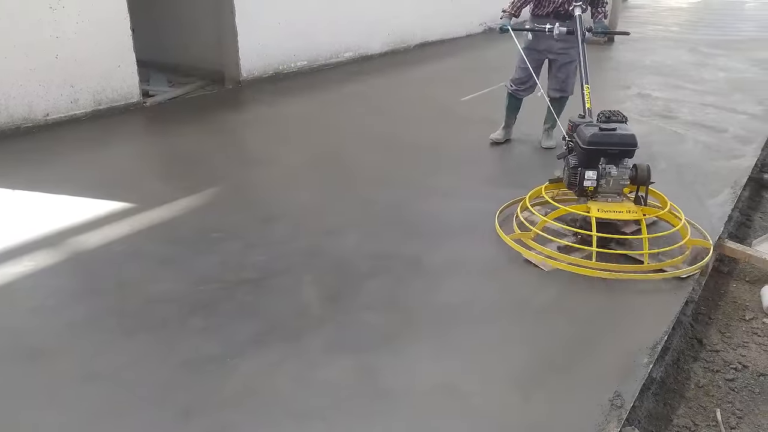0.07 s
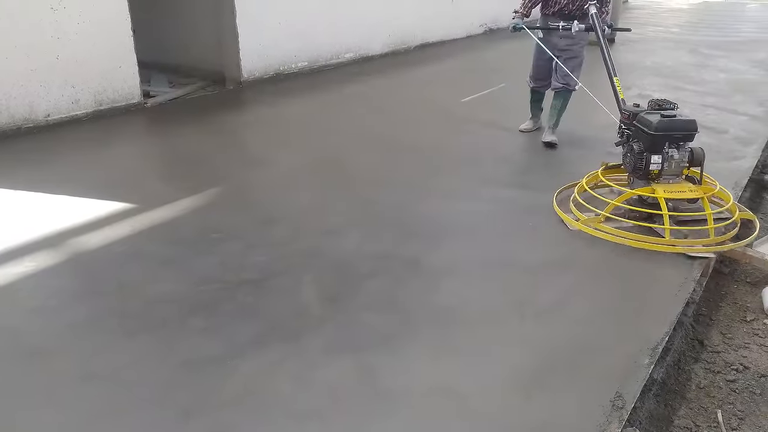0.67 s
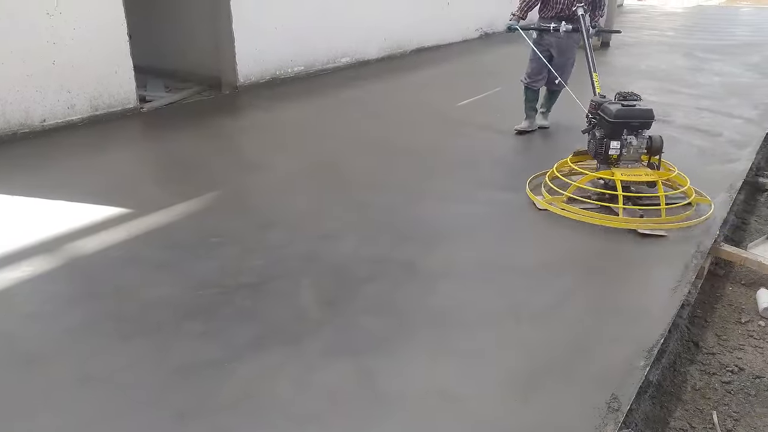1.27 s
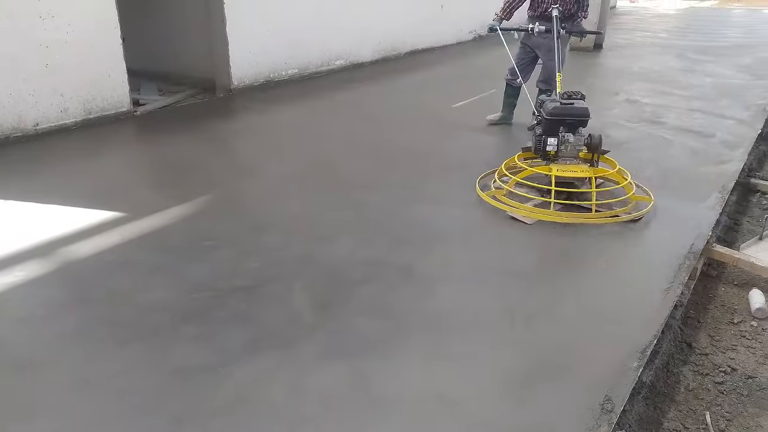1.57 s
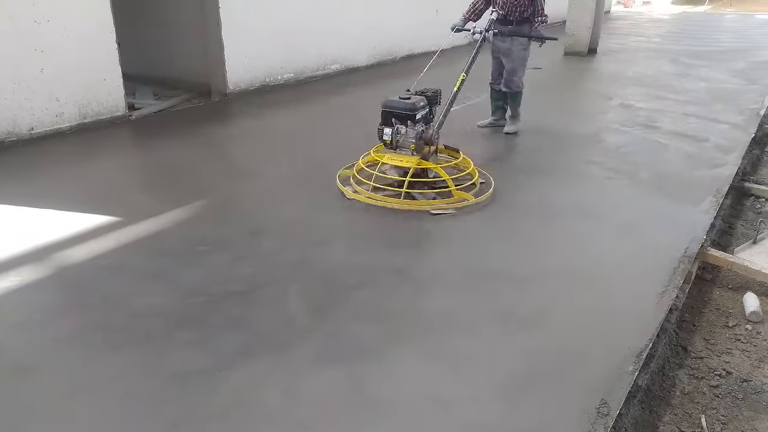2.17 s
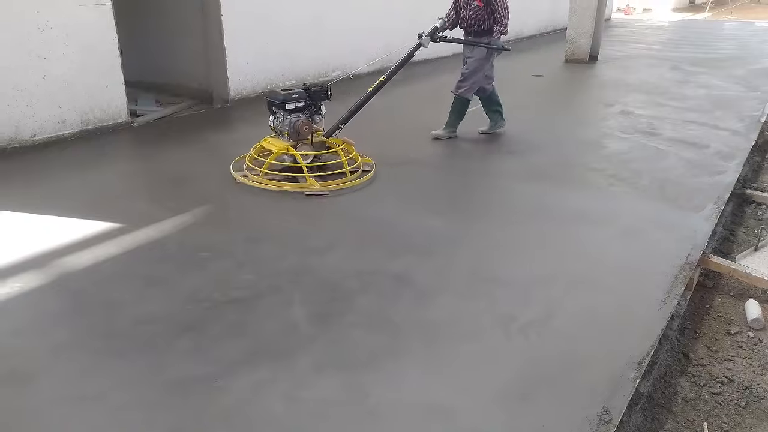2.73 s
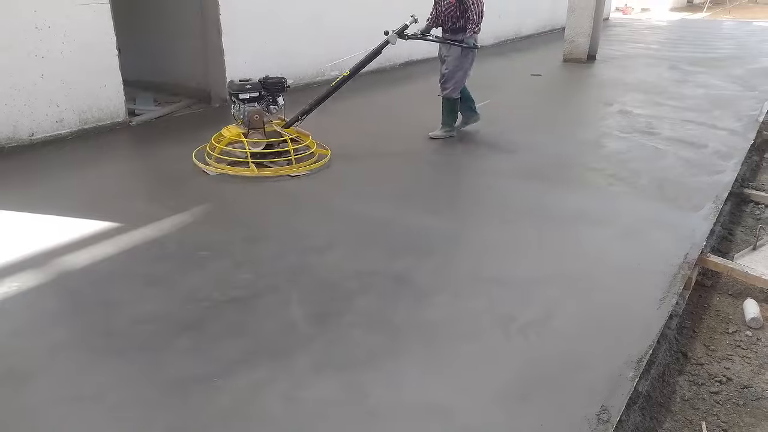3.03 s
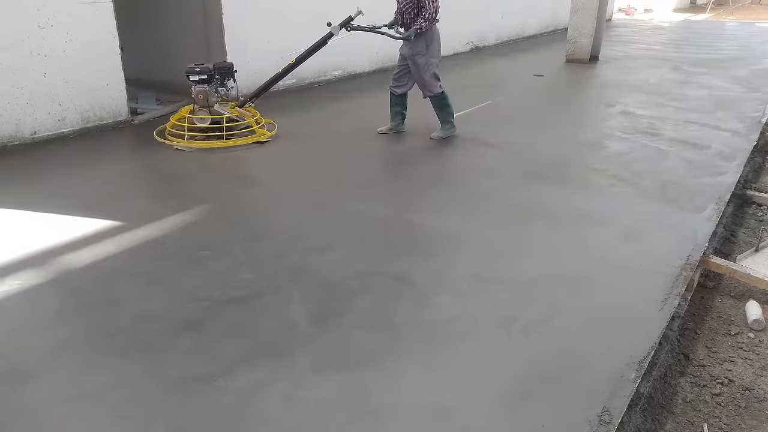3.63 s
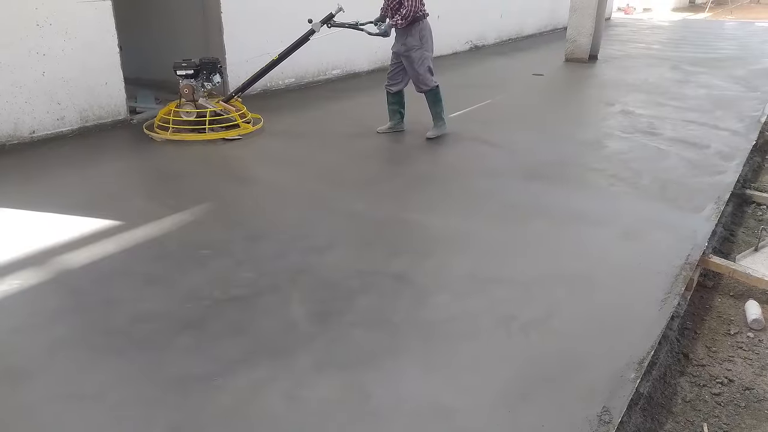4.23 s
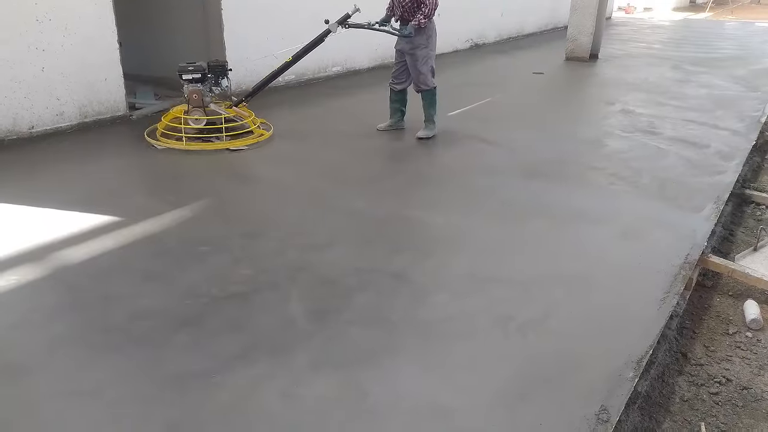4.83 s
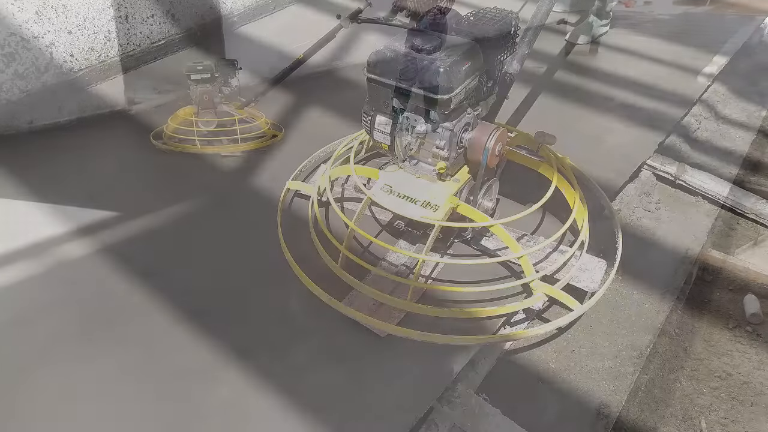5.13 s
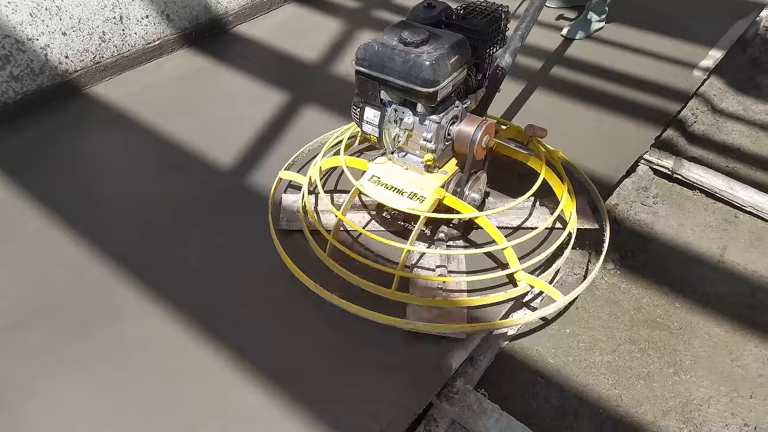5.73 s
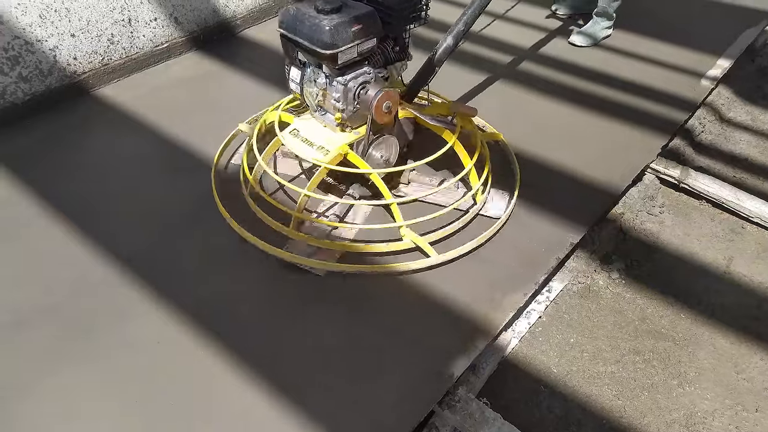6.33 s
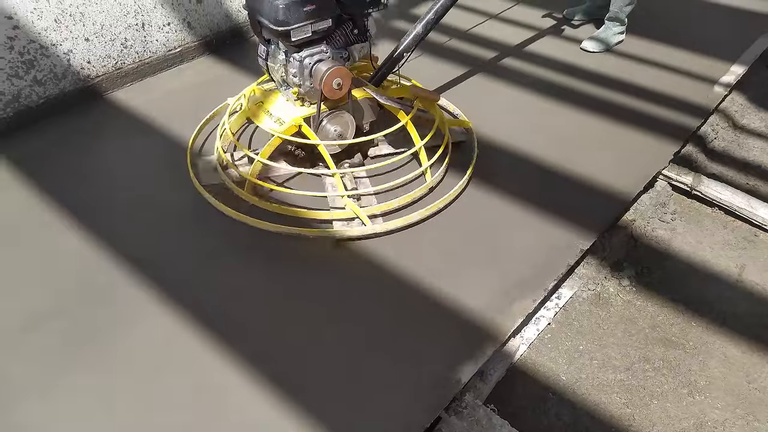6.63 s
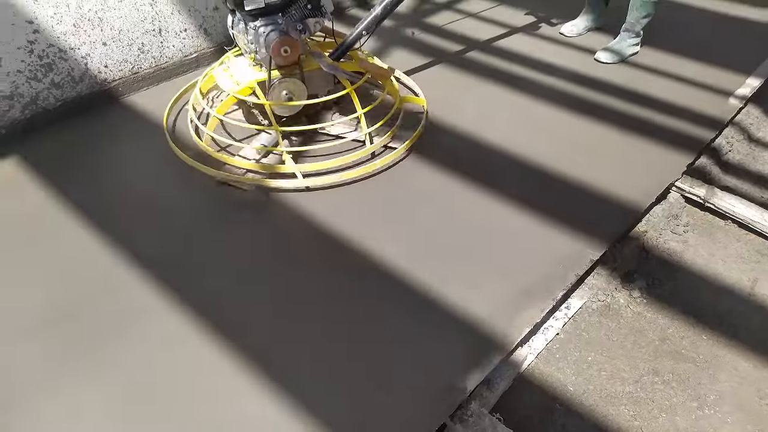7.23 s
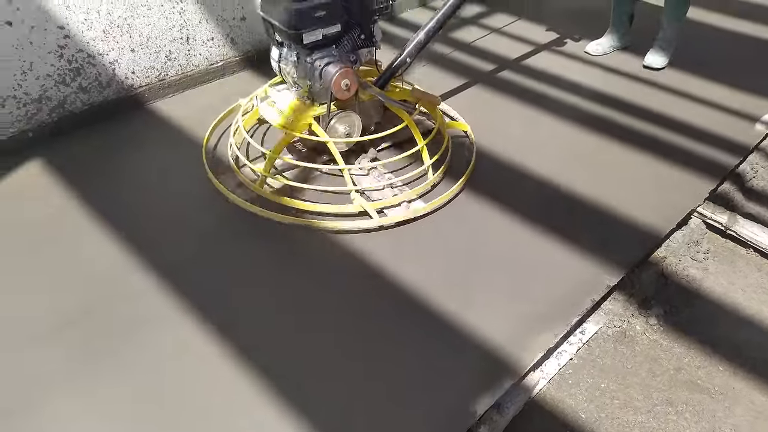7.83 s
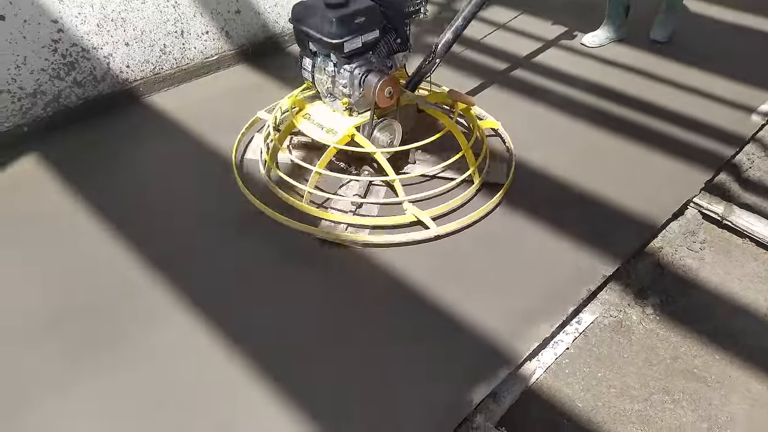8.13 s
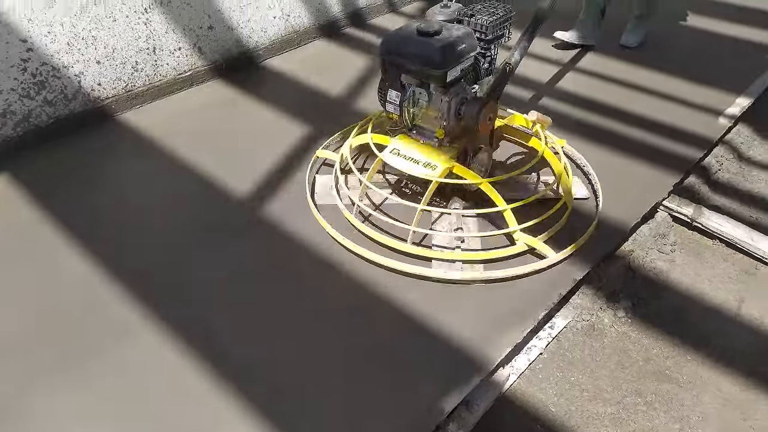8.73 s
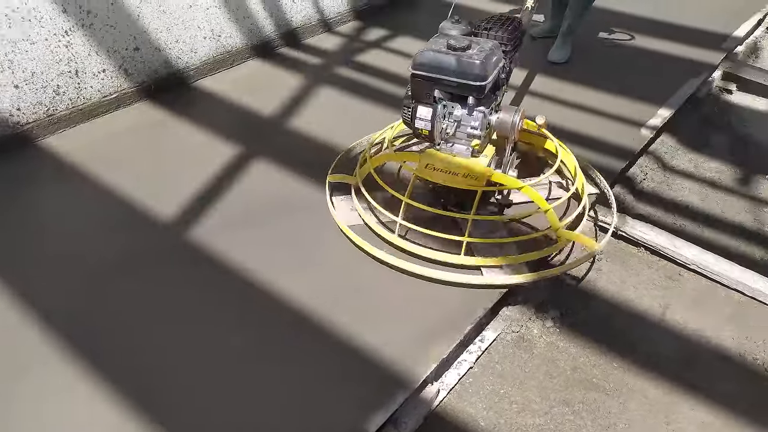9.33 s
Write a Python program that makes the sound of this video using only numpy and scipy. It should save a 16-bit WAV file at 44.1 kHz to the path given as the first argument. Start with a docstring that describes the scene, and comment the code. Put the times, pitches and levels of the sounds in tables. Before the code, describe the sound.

From the start, a walk-behind power trowel is heard at a distance, working a concrete slab outdoors beside a wall. Its single-cylinder petrol engine drones, ticks and rattles, dipping slightly under load. The steel blades hiss and grind over the surface with irregular light knocks, swelling with each pass for the first 1.5 seconds. Light wind rumbles on the microphones, with a small gust near 0.4 seconds. At about 5.3 seconds everything cuts to a short silence. From 5.5 seconds the machine is close by, with a chugging exhaust, a rattling guard and coarser scraping, and another gust passes near 5.8 seconds. The blades dig in with short groans around 6.4 and 6.7 seconds. Near 7.6 seconds the engine sags deeply, then recovers. The blades groan again around 7.9 and 8.4 seconds, and the machine keeps running until the end at 9.5 seconds.

```python
"""A walk-behind power trowel finishes a concrete slab beside a wall, heard at a pair of microphones.
From afar at first, its single-cylinder four-stroke engine drones, ticks and rattles, sagging under load,
while the steel blades hiss round over the concrete and knock in light wind. At 5.3 s, a short silence.
From 5.5 s the machine is close by: the exhaust chugs, the blades dig in and groan, and near 7.6 s
the engine sags deeply, then recovers."""
import sys
import numpy as np
from scipy import signal
from scipy.fft import rfft, irfft
from scipy.io import wavfile
from scipy.ndimage import uniform_filter1d

SR = 44100
rng = np.random.default_rng(int(sys.argv[2]) if len(sys.argv) > 2 else 0)


def bounce(signal):
    """Save signal as a 16-bit WAV file at the path given by the first command-line argument."""
    frames = np.transpose(np.atleast_2d(signal))
    limited = np.clip(frames, -1, 1)
    pcm = np.round(limited * 32767).astype(np.int16)
    wavfile.write(sys.argv[1], SR, pcm)


N = 418950
TIME = np.arange(N) / SR
HZ = np.fft.rfftfreq(N, 1 / SR)


def amp(db):
    """Decibels to gain."""
    return 10 ** (np.asarray(db) / 20)


def unit(x):
    """Scales to rms 1."""
    return x / np.sqrt(np.mean(x ** 2) + 1e-20)


def curve(rows):
    """Rows of (t/s, value), joined by straight lines."""
    return np.interp(TIME, *np.transpose(rows))


def spectrum(points):
    """Rows of (f/Hz, value), joined by straight lines over log frequency."""
    hz, value = np.transpose(points)
    return np.interp(np.log(HZ + 1), np.log(hz), value)


def colour(x, points):
    """Filters by rows of (f/Hz, gain/dB), then scales to rms 1."""
    return unit(irfft(rfft(x) * amp(spectrum(points)), N))


def wander(rate_hz):
    """Random drift of rms 1, up to about rate_hz."""
    return unit(irfft(rfft(rng.standard_normal(N)) * np.exp(-(HZ / rate_hz) ** 2), N))


def swell(s, width_s):
    """A bell-shaped rise and fall around time s."""
    return np.exp(-np.minimum(((TIME - s) / width_s) ** 2, 20))


def swells(rows):
    """The sum of swells, each (t/s, height, half-length/s)."""
    return sum(height * swell(s, width_s) for s, height, width_s in rows)


def bursts(rows):
    """The gain of passing sounds, each (t/s, level/dB, half-length/s)."""
    return sum(amp(db) * swell(s, width_s) for s, db, width_s in rows)


def delayed(x, delay_s):
    """Both channels, later by a steady or drifting delay."""
    return np.array([np.interp(TIME - delay_s, TIME, channel, left=0) for channel in x])


# time spent far from the machine, then close by: start t/s, end t/s
FAR_AND_NEAR = [(0, 5.263), (5.481, 9.5)]
NEAR_FROM_S = FAR_AND_NEAR[1][0]
def by_place(far, near):
    """The far value first, the near one once the microphones stand close."""
    return np.where(TIME < NEAR_FROM_S, far, near)


# likeness of the left and right microphones: f/Hz, coherence/0-1
MIC_COHERENCE = [(60, 1), (290, 0.97), (640, 0.7), (950, 0.95), (1400, 0.01), (3100, 0.17), (7000, 0)]
def pair_noise():
    """Noise at two microphones: alike in the bass, unrelated in the treble."""
    mid, side = rfft(rng.standard_normal((2, N)))
    coherence = np.clip(spectrum(MIC_COHERENCE), 0, 1)
    mid *= np.sqrt((1 + coherence) / 2)
    side *= np.sqrt((1 - coherence) / 2)
    return irfft(np.array([mid + side, mid - side]), N)


# the engine sags, or overshoots if negative: t/s, drop in firing rate/Hz, half-length/s
LOAD_SAGS = [(.11, .56, .4), (.95, .84, .15), (1.5, 1.57, .49), (2.61, 1.15, .28), (3.42, -.5, .09),
             (5, 1.2, .14), (5.76, 2.97, .24), (6.27, -.83, .16), (6.56, .95, .37), (7.57, 6.03, .31),
             (8.29, -1.34, .13), (8.54, 2.67, .26), (9.25, 2.12, .18)]
def engine_cycles(governed_hz=32.45):
    """Running count of firings: the governed rate drops as the blades bite, then recovers."""
    firing_hz = (governed_hz - swells(LOAD_SAGS)) * (1 + .002 * wander(10))
    return np.cumsum(firing_hz) / SR


# engine tones from afar and close by: multiple of the firing rate, relative level/dB
FAR_HARMONICS = [(1, -29), (2, 1), (3, -4.5), (4, -15.5), (5, -5.5), (6, -5), (7, -12), (8, -17), (9, -2.5),
                 (10, -0.5), (11, -3.5), (12, -8), (13, -12.5), (14, -11), (15, -16)]
NEAR_HARMONICS = [(1, 2.5), (2, 4), (3, -3.5), (4, -21), (5, -5), (6, -2), (7, -14.5), (8, -6), (9, 4.5),
                  (10, 3), (11, -2.5), (12, -8.5), (13, -7.5), (14, -14.5), (15, -7)]
# one tone swells or fades as the machine swings round: t/s, multiple, change/dB, half-length/s
HARMONIC_SWELLS = [(.35, 10, -18.5, 0.33), (1.101, 9, -13.5, 0.17), (1.2, 7, -10, 1), (1.25, 10, 2.5, 0.42),
                   (1.35, 12, 6.5, 0.35), (1.85, 9, 13, 0.63), (1.97, 6, -6.5, 0.16), (2.3, 11, -8.5, .35),
                   (2.151, 12, 10, 0.18), (2.294, 9, -17.5, .05), (2.596, 12, 9, 0.21), (2.602, 9, 3, 0.2),
                   (2.677, 5, -9, 0.14), (3.12, 12, 8.5, 0.13), (3.168, 6, -15, 0.087), (3.25, 9, 8, 0.21),
                   (3.7, 7, 1, 1), (4.151, 8, 11.5, .6), (4.1, 10, -0.5, 0.68), (5.85, 9, 0.5, 0.31),
                   (6.25, 11, 3, 0.29), (6.6, 7, 9, .45), (6.6, 9, -5, .45), (7.268, 8, 13, 0.068),
                   (7.5, 10, -11.5, .25), (7.6, 15, -7, .3), (8.15, 10, -6.5, 0.083), (8.15, 8, 8.5, .12),
                   (7.62, 9, 8, 0.18), (7.78, 11, 10.5, 0.064), (8.56, 12, 11, 0.092),
                   (8.97, 5, -13.5, .05), (9.05, 11, -0.5, .25), (8.85, 10, -4, 0.26)]
def firing_tones(cycles, drift_db=1.1, uneven_db=1.1, pulse_at=.1):
    """Harmonics of the uneven firing pulses; each fades as the wall's reflection slips against it."""
    tones = np.zeros((2, N))
    # echoes scatter the tones' timing from afar; close by they line up into a chug
    scatter_turns = by_place(.36, .16)
    wall_share, slip_per_order = by_place(.24, .42), by_place(.2, .36)
    for order, ((_, far_db), (_, near_db)) in enumerate(zip(FAR_HARMONICS, NEAR_HARMONICS), 1):
        turns = order * (cycles - pulse_at) + scatter_turns * rng.standard_normal()
        phase = 2 * np.pi * turns + .15 * wander(3)
        beaming_db = swells((s, db, width) for s, k, db, width in HARMONIC_SWELLS if k == order)
        tone_db = by_place(far_db, near_db) + beaming_db + drift_db * wander(2.8)
        mic_offset = .15 * rng.standard_normal()
        phases = np.array([phase + mic_offset, phase - mic_offset])
        slip = order * slip_per_order * wander(1.3)
        tones += amp(tone_db) * (np.cos(phases) + wall_share * np.cos(phases + slip))
    return unit(tones * amp(uneven_db * wander(22)))


# gas noise from the muffler: f/Hz, gain/dB
PUFF_COLOUR = [(20, -22), (60, -4.5), (110, -36.5), (165, 5), (215, 11.5), (320, 10), (400, 6.5),
               (500, -34)]
# roughness of the firing: t/s, the puffs' share of the power/0-1
ROUGHNESS = [(0, .08), (1, .045), (2.5, .05), (3.1, .08), (4.5, .09), (5.5, .12), (6.2, .14), (7, .19),
             (7.5, .25), (8.35, .36), (8.65, .1), (9.5, .09)]
# upper edges of the throb, boom, drone, bark and overtones: f/Hz
REGISTER_EDGES = [140, 177, 255, 345, 480]
# the four registers above the throb, towards the microphones: t/s, level/dB
BOOM_LEVEL = [(0, -34), (.8, -34), (1.6, -29), (2, -25), (2.45, -24), (2.7, -35), (3, -32), (3.25, -23),
              (3.7, -23), (4.3, -32.5), (5.2, -23), (5.95, -29), (6.35, -25), (7, -35.5), (7.8, -27.5),
              (8.05, -38.5), (8.27, -26.5), (9.5, -20.5)]
DRONE_LEVEL = [(0, -25), (.6, -27), (1.05, -22), (1.7, -23), (2.05, -27.5), (2.4, -26), (3.15, -23.5),
               (3.65, -22), (4.25, -25), (4.8, -22), (5.5, -29.5), (6.5, -25), (7.65, -26), (8.05, -30),
               (8.5, -22.5), (9.15, -30.5), (9.5, -27.5)]
BARK_LEVEL = [(0, -29), (.7, -30), (1.95, -22.5), (2.3, -28.5), (2.65, -20.5), (2.92, -26.5), (3.25, -19.5),
              (4.95, -27), (5.25, -23), (6.05, -24), (6.35, -27), (7.5, -26.5), (7.8, -22), (8.3, -31.5),
              (8.8, -25), (9.5, -23)]
OVERTONE_LEVEL = [(0, -34), (.75, -32.5), (1.2, -23), (1.85, -24.5), (2.15, -23.5), (2.36, -26.5),
                  (2.6, -24), (2.9, -27), (3.4, -26.5), (4.5, -30), (5.25, -29.5), (5.9, -31), (6.38, -29),
                  (6.6, -30.5), (7.4, -35.5), (7.8, -26.5), (8.1, -38), (8.55, -24), (9.5, -33)]
def exhaust(cycles, throb_db=-36.5, puff_floor=.14, puff_decay_cycles=.14):
    """Each firing pushes a pulse and a puff of gas through the muffler."""
    tones = firing_tones(cycles)
    puff_shape = puff_floor + np.exp(-(cycles % 1) / puff_decay_cycles)
    puffs = colour(pair_noise() * puff_shape, PUFF_COLOUR)
    rough = np.clip(curve(ROUGHNESS), 0, 1)
    gas = rfft(np.sqrt(1 - rough) * tones + np.sqrt(rough) * puffs)
    # the crankcase throb is steady; the muffler's registers beam differently
    levels_db = [throb_db, *map(curve, [BOOM_LEVEL, DRONE_LEVEL, BARK_LEVEL, OVERTONE_LEVEL])]
    out, below = np.zeros((2, N)), 0
    for edge_hz, level_db in zip(REGISTER_EDGES, levels_db):
        low_pass = 1 / (1 + (HZ / edge_hz) ** 30)
        register = irfft(gas * (low_pass - below), N)
        power = uniform_filter1d(np.mean(register ** 2, axis=0), size=SR // 3)
        out += amp(level_db) * register / np.sqrt(power + 1e-12)
        below = low_pass
    return out


# the valve cover swings towards the microphones: t/s, rise/dB, half-length/s
VALVE_FACING = [(3.1, 3, 0.9), (7.75, 6, 0.21)]
def valves(cycles, turned_away_db=-28.5, decay_cycles=.085, second_at=.47, second_db=-7):
    """The valves tick brightly twice in each engine cycle, the second tick softer."""
    first = np.exp(-(cycles % 1) / decay_cycles)
    second = amp(second_db) * np.exp(-((cycles - second_at) % 1) / decay_cycles)
    ticks = pair_noise() * (first + second) * amp(wander(25))
    tick_colour = [(700, -16), (1500, -5), (2500, -3), (3400, -3), (5500, -2), (8800, 4),
                   (10500, -5), (12000, -13.5), (15000, -30)]
    return amp(turned_away_db + swells(VALVE_FACING)) * colour(ticks, tick_colour)


# modes of the belt guard: f/Hz, relative level/dB, t60/s
GUARD_MODES = [(2320, -1.5, 0.0076), (2494, -2.5, .018), (2550, -0.5, .012), (2920, -2, 0.015)]
# its rattle: t/s, level/dB
RATTLE_LEVEL = [(0, -37), (1.3, -38), (2.1, -31), (2.6, -36), (5.3, -55), (5.5, -30.5), (6.4, -28.5),
                (7, -33), (8.4, -41), (9.5, -43.5)]
# it shakes harder for a moment: t/s, rise/dB, half-length/s
GUARD_SHAKES = [(.25, 9, 0.043), (3.12, 10, .12), (5.52, 4, .03), (5.68, 11, 0.038), (5.85, 4, .03),
                (6.05, 11, 0.043)]
def guard_rattle(cycles, press_db, uneven_db=3, loose_turns=.11, press_share=.77):
    """The guard is struck once per crankshaft turn, twice to a firing, harder when a blade presses."""
    turns = np.maximum.accumulate(2 * cycles + loose_turns * wander(60))
    strikes = np.diff(np.floor(turns), prepend=0).clip(0, 1)
    strikes *= amp(uneven_db * wander(60) + press_share * press_db)
    t = np.arange(SR // 30) / SR
    ringing = np.zeros((2, N))
    for hz, db, t60 in GUARD_MODES:
        # each strike stirs each mode by a different amount
        blows = strikes * (rng.standard_normal((2, N)) + 1j * rng.standard_normal((2, N)))
        mode = amp(db - 60 * t / t60) * np.exp(2j * np.pi * hz * t)
        ringing += signal.oaconvolve(blows, mode[None])[:, :N].real
    band = [(1200, -30), (2100, .5), (2950, -.5), (3300, -19), (6000, -34)]
    return amp(curve(RATTLE_LEVEL) + swells(GUARD_SHAKES)) * colour(ringing, band)


# rotor speed, unsteady at first while the machine is swung about: t/s, blade passes per firing
ROTOR_SPEED = [(0, .277), (.3, .241), (.6, .248), (.9, .264), (1.15, .312), (1.3, .298), (1.5, .275),
               (1.7, .26)]
# swell of each passing blade, deepest along the slab's edge: t/s, swing/dB
BLADE_SWING = [(0, 2.6), (.95, 3.1), (1.45, 2.9), (1.65, 1), (2.6, .3), (9.5, 0.3)]
# a blade meets a high spot on the slab: t/s, rise/dB
SLAB_HIGH_SPOTS = [(2.056, 0), (3.044, 2.5), (3.627, 3), (4.385, 3), (4.461, 4), (4.753, 4), (4.82, 1),
                   (5.085, 2.5), (5.51, 4.5), (5.618, 3), (6.103, 1), (6.243, 2), (6.62, 0), (6.871, 3),
                   (6.983, 4), (7.15, 5), (8.3, 2.5), (8.811, 3.5), (9.105, 1.5), (9.218, 1.5)]
def blade_pressure_db(cycles, spot_s=.03, unsteady_db=.45):
    """How hard the steel presses: it rises with each passing blade and on high spots."""
    passes = np.cumsum(np.diff(cycles, prepend=0) * curve(ROTOR_SPEED))
    spots = sum(rise * swell(s, spot_s) for s, rise in SLAB_HIGH_SPOTS)
    return curve(BLADE_SWING) * np.cos(2 * np.pi * passes) + spots + unsteady_db * wander(16)


# narrow resonances of the steel blades and guard: f/Hz, half-width/Hz, rise/dB
STEEL_RESONANCES = [(1541, 18, 5.5), (1675, 38, 5.5), (1860, 15, 4), (2010, 45, 4), (7450, 70, 0.5),
                    (9250, 62, 3.5)]
# grit under the blades, from afar and close by: f/Hz, gain/dB
FAR_GRIND_COLOUR = [(330, -7.5), (470, -3.5), (640, -1.5), (1000, 5.5), (1400, -3), (1650, -0.5),
                    (2000, -3.5), (2500, 1), (2950, -2), (3300, -7), (4200, -26.5)]
NEAR_GRIND_COLOUR = [(330, -4), (470, -2.5), (620, 7), (1000, 6), (1400, 8), (1650, 1), (2000, 1.5),
                     (2450, 10), (3300, -3), (4200, -26.5)]
FAR_HISS_COLOUR = [(2500, -42), (3600, 1.5), (4400, -1.5), (5600, 1.5), (7400, 3.5), (8800, 8), (9600, 2.5),
                   (10500, 0), (12000, -11.5), (13300, -9), (15000, -43)]
NEAR_HISS_COLOUR = [(2500, -8.5), (3600, -1), (4600, -3), (5700, -3), (7400, -0.5), (8800, 4), (9600, 4),
                    (10500, -1), (12000, -14.5), (13300, -14.5), (15000, -56)]
# grinding and hiss together: t/s, base level/dB
SCRAPE_LEVEL = [(0, -16), (3.25, -17), (4.6, -17.5), (5.25, -20.5), (5.5, -15.5), (6.2, -16), (7.1, -18),
                (9.5, -15.5)]
# the coarser hiss of dry sand: t/s, base level/dB
SAND_LEVEL = [(0, -36), (.7, -40), (1.3, -37), (1.9, -32), (2.6, -35.5), (4.6, -45.5), (5.5, -40.5),
              (6.6, -34.5), (7.3, -29.5), (7.9, -37), (9.5, -36.5)]
def scrape(press_db, far_grind_db=-3, near_grind_db=-2, hiss_db=-3.5, grind_share=.4):
    """Steel drags over sand grains: a coarse grinding and a fine hiss that swell with each blade."""
    grit = amp(.5 * wander(260))
    steel = amp(sum(db / (1 + ((HZ - hz) / width) ** 2) for hz, width, db in STEEL_RESONANCES))
    coarse = irfft(rfft(pair_noise() * grit * amp(.95 * wander(42))) * steel, N)
    fine = irfft(rfft(pair_noise() * grit) * steel, N)
    grind = by_place(amp(far_grind_db) * colour(coarse, FAR_GRIND_COLOUR),
                     amp(near_grind_db) * colour(coarse, NEAR_GRIND_COLOUR))
    hiss = by_place(colour(fine, FAR_HISS_COLOUR), colour(fine, NEAR_HISS_COLOUR))
    sand = colour(fine, [(3200, -17), (4000, -1), (4800, 3), (5400, -13), (6500, -2.5),
                         (7500, -3), (9000, -20.5)])
    scraping = grind * amp(grind_share * press_db) + hiss * amp(hiss_db + press_db)
    return amp(curve(SAND_LEVEL) + press_db) * sand + amp(curve(SCRAPE_LEVEL)) * scraping


def slab_echo(x, echo_db=-11, delay_s=.0021, drift_s=.000159):
    """The wet slab mirrors the scraping; the path to the microphones shifts as the machine moves."""
    return x + amp(echo_db) * delayed(x, delay_s + drift_s * wander(.58))


def hiss_shimmer(x, depth_db=1.3):
    """Random narrow bands of the scraping hiss briefly swell and fade."""
    frames = signal.stft(x, nperseg=512)[2]
    smoothing = np.outer(np.hanning(7), np.hanning(16))
    shimmer = signal.oaconvolve(rng.standard_normal(frames.shape[1:]), smoothing, "same")
    return signal.istft(frames * amp(depth_db * unit(shimmer)), nperseg=512)[1][:, :N]


# the blades' ringing, which the light knocks also follow: t/s, base level/dB
RING_LEVEL = [(0, -19), (1.2, -28.5), (1.95, -25.5), (2.7, -35.5), (3.45, -33), (3.8, -22), (5.2, -25.5),
              (5.5, -34.5), (6.9, -18.5), (7.5, -20.5), (9.5, -21.5)]
def blade_ring(gain_db=-3, flutter_db=2):
    """Constant small slips keep the blades ringing in one broad resonance."""
    slips = pair_noise() * amp(flutter_db * wander(32))
    far = colour(slips, [(500, -52), (760, -11.5), (900, -1), (1030, -3.5), (1250, -1.5), (1600, -51)])
    near = colour(slips, [(450, -27), (700, -2.5), (860, -2), (980, 1), (1250, -14.5), (1600, -36)])
    return by_place(far, near) * amp(curve(RING_LEVEL) + gain_db)


def hum(hum_hz=133, hum_db=-38):
    """A faint steady hum, heard only at the far position."""
    phase = 2 * np.pi * hum_hz * TIME + .21 * wander(2.7)
    return by_place(amp(hum_db), 0) * np.sqrt(2) * np.sin(phase)


# gusts on the microphones: t/s, level/dB, half-length/s
MIC_GUSTS = [(.35, -33, .12), (.62, -38, 0.07), (5.555, -39, .08), (5.8, -27, .1)]
def wind(rumble_db=-42, apart=.27):
    """A low rumble and light gusts, partly different at each microphone."""
    def air():
        return pair_noise() + apart * rng.standard_normal((2, N))
    buffets = colour(air(), [(4, -13), (15, 5), (35, -11.5), (80, -26), (300, -76)])
    rumble = colour(air(), [(8, -10), (25, -14), (45, -8), (70, -5), (110, -4), (300, -43)])
    return bursts(MIC_GUSTS) * buffets + amp(rumble_db) * rumble


def light_knocks(count=700, per_s=70, far_hz=975, near_hz=900, spread_hz=77, far_db=.5, near_db=-1.5):
    """Chance knocks of the blades at uneven intervals, as rows of (t/s, level/dB, f/Hz)."""
    times = (np.arange(count) + .7 * rng.random(count)) / per_s
    scatter_db, detune = rng.standard_normal((count, 2)).T
    far = times < NEAR_FROM_S
    ring_db = np.interp(times, *np.transpose(RING_LEVEL))
    level_db = ring_db + np.where(far, far_db, near_db) + scatter_db
    pitch_hz = np.where(far, far_hz, near_hz) + spread_hz * detune
    return [row for row in zip(times, level_db, pitch_hz) if row[0] < N / SR]


# a blade knocks hard on the slab: t/s, level/dB, f/Hz
HARD_KNOCKS = [(0.026, -7, 1030), (0.106, -19, 960), (0.13, -10, 1050), (0.146, -10, 940), (0.168, -9, 934),
               (0.314, -23, 975), (0.402, -13, 980), (0.417, -12, 937), (0.456, -18, 925),
               (0.502, -14.1, 1050), (0.631, -11.5, 940), (0.744, -9.5, 1040), (0.8, -19, 913),
               (1.034, -14, 895), (1.08, -10, 1080), (1.416, -10, 960), (1.515, -8.5, 860),
               (1.76, -15, 1066), (1.798, -12.5, 887), (1.885, -12.5, 980), (1.957, -10, 946),
               (2.067, -10.5, 940), (2.082, -14, 990), (2.287, -10, 950), (2.4, -9, 1034),
               (2.739, -14, 960), (2.866, -17.5, 900), (3.063, -11.5, 907), (3.597, -12.5, 975),
               (3.613, -14, 910), (3.648, -8.5, 965), (3.862, -11.5, 910), (3.891, -11, 930),
               (3.95, -12, 910), (4.047, -9, 890), (4.107, -12, 970), (4.447, -12, 940), (4.467, -12, 960),
               (4.482, -13, 876), (4.491, -11, 956), (4.602, -9, 900), (4.616, -14, 950),
               (4.799, -9.5, 953), (4.941, -8.5, 940), (5.0, -13, 893), (5.085, -8.5, 975),
               (5.095, -12.5, 880), (5.191, -9, 994), (5.962, -12, 980), (6.141, -12.5, 925),
               (6.4, -14, 990), (6.788, -11, 910), (6.888, -13, 1013), (6.959, -11, 905), (6.992, -19, 880),
               (7.015, -13, 970), (7.111, -14, 910), (7.289, -13, 890), (7.3, -15, 870), (7.317, -16, 830),
               (7.367, -12, 835), (7.453, -13, 860), (7.51, -12.5, 890), (7.939, -17, 1002),
               (8.007, -12.5, 810), (8.127, -13, 910), (8.331, -14, 1019), (8.541, -16, 960),
               (9.039, -12, 880), (9.2, -14, 836), (9.225, -14, 1045), (9.478, -12, 894)]
def blade_knocks(peak_s=.0032, fall_hz_per_s=13000, upper_ratio=1.9, upper_db=-17, tick_db=-21,
                 wall_db=-11, wall_s=.009):
    """A blade hits the slab: a gritty tick, a ring that falls as it springs free, the wall's echo."""
    out = np.zeros((2, N))
    t = np.arange(SR // 40) / SR
    envelope = (t / peak_s * np.exp(1 - t / peak_s)) ** 2
    for s, db, pitch_hz in list(HARD_KNOCKS) + light_knocks():
        mic_phases = 2 * np.pi * rng.random() + .22 * rng.standard_normal((2, 1))
        turns = pitch_hz * t - fall_hz_per_s * (t - peak_s) ** 2 / 2
        ring = np.sin(2 * np.pi * turns + mic_phases)
        upper_mode = amp(upper_db) * np.sin(2 * np.pi * (upper_ratio * turns + rng.random((2, 1))))
        tick = amp(tick_db) * rng.standard_normal((2, len(t))) * np.exp(-t / peak_s)
        knock = envelope * (ring + upper_mode + tick)
        start = round(s * SR)
        out[:, start:start + len(t)] += np.sqrt(2) * amp(db) * knock[:, :N - start]
    return out + amp(wall_db) * delayed(out, wall_s)


# a blade skims flat: t/s, base level/dB, half-length/s
FLAT_SKIMS = [(.25, -26, 0.045), (.38, -25, 0.039), (1.2, -32, 0.28), (4.47, -19.5, 0.033),
              (4.58, -21, 0.019), (4.79, -23, 0.22), (5.662, -24, .07), (5.8, -23, 0.12), (7.33, -23, 0.21),
              (9.05, -32, .15)]
def skim(press_db):
    """A blade lies flat on the smooth paste and draws out a fine, high swish."""
    grains = pair_noise() * amp(1.2 * wander(200))
    far = colour(grains, [(5000, -23), (6800, -9), (8000, 2), (9000, -2), (10000, -10), (12000, -31)])
    near = colour(grains, [(6000, -30), (8000, 1), (9200, 1), (10000, 1), (10800, -12), (12000, -28)])
    return bursts(FLAT_SKIMS) * amp(press_db / 2) * by_place(far, near)


# a blade digs in, loudest close by: t/s, level/dB, half-length/s
BLADE_DIGS = [(3.663, -40, 0.1), (5.6, -46, 0.072), (6.39, -22, 0.06), (6.683, -19, 0.045),
              (7.85, -27, 0.2), (8.44, -19.5, 0.18)]
def groan(flutter_db=3):
    """Heavy drag shakes the blades in a lower resonance."""
    slips = pair_noise() * amp(flutter_db * wander(54))
    resonance = [(330, -17), (480, 1), (590, 12), (700, .5), (1300, 2), (2000, -45)]
    return bursts(BLADE_DIGS) * colour(slips, resonance)


# the right microphone against the left: f/Hz, level/dB
MIC_BALANCE = [(100, 0), (1000, -1), (2500, 2), (5000, -1), (9000, 3), (11000, -7), (13000, -6)]
def scene(left_lag_s=8e-5):
    """The trowel works a little to the right: the left microphone hears it slightly later."""
    cycles = engine_cycles()
    press_db = blade_pressure_db(cycles)
    engine = exhaust(cycles) + valves(cycles) + guard_rattle(cycles, press_db)
    background = wind() + hum()
    scraping = hiss_shimmer(slab_echo(scrape(press_db) + skim(press_db)))
    blades = scraping + blade_ring() + groan() + blade_knocks()
    lean_db = spectrum(MIC_BALANCE) / 2
    left = amp(-lean_db) * np.exp(-2j * np.pi * HZ * left_lag_s)
    right = amp(lean_db)
    return irfft(rfft(engine + blades) * np.array([left, right]), N) + background


def record(dry, top_hz=15500):
    """Silence between the far and near positions, a full-scale limit and a band limit."""
    heard = sum((TIME >= start) & (TIME <= end) for start, end in FAR_AND_NEAR)
    gate = uniform_filter1d(heard.astype(float), size=48)
    limited = np.clip(dry * gate, -1, 1)
    low_pass = signal.firwin(511, top_hz, window=("kaiser", 9), fs=SR)
    return signal.oaconvolve(limited, low_pass[None], "same")


dry = scene()
out = record(dry)
bounce(out)
```